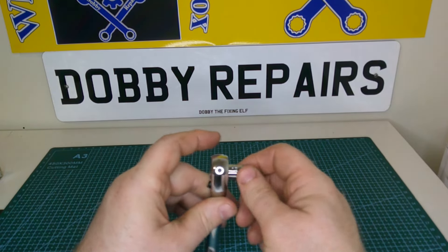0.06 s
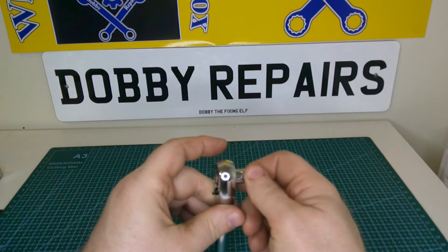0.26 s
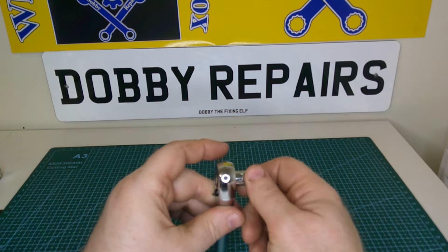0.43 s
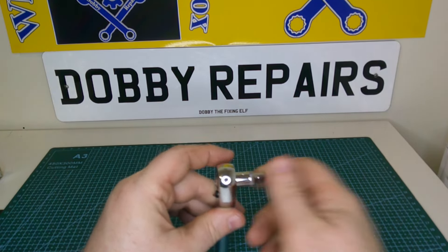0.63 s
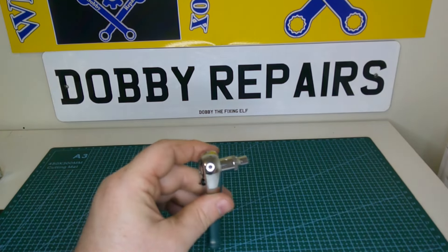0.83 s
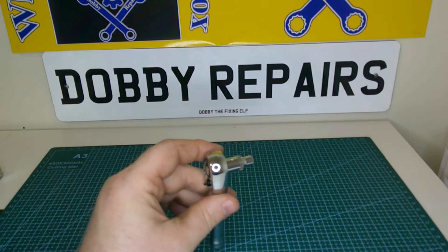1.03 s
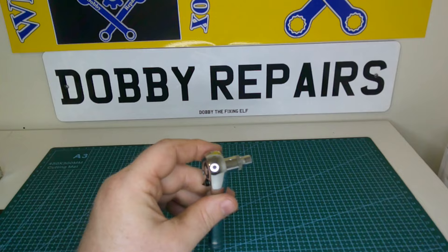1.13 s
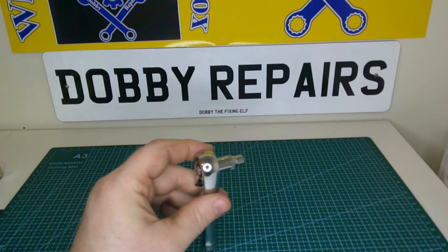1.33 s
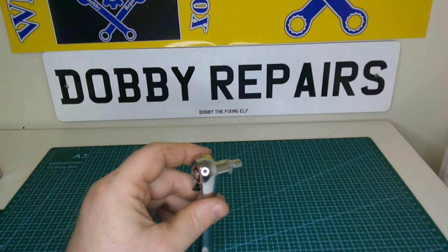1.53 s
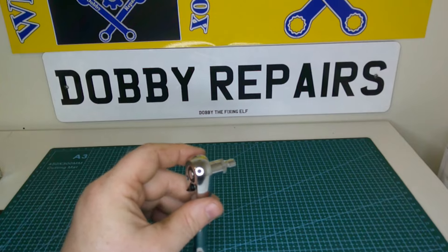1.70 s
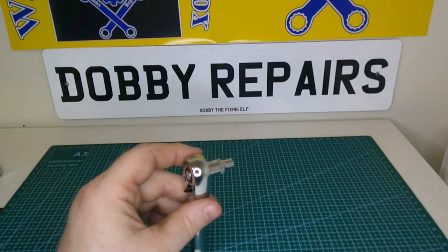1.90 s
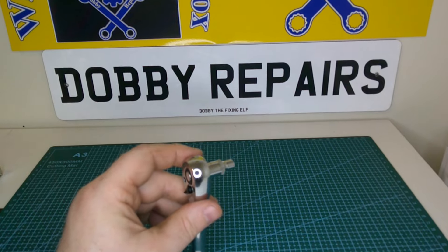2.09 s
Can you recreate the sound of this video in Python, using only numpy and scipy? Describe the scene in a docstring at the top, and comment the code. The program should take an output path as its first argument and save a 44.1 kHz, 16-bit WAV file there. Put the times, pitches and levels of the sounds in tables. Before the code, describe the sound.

A small hand ratchet clicks sharply in two fast runs, then a light tick and grainy finger slides, two faint ticks and a dull scuff; close microphone with dulled extreme treble, low rumble, hiss and faint hum.

```python
"""Close on a workbench, fingers turn a small steel ratchet: two short twists of pawl clicks, a light tick between them.
Each click is a crack of noise and damped rings of pawl and head, with one rebound and a small room's answer.
The hand lets go with a last tick and slides away, in swells of grainy noise; then the other hand shifts its grip,
with more swells, two faint ticks and a dull scuff. Rumble, hiss and a faint hum lie under it all,
and the microphone keeps nothing above the clicks' bright ring."""
import sys
import numpy as np
from scipy import signal
from scipy.fft import rfft, irfft, next_fast_len
from scipy.io import wavfile
from scipy.ndimage import map_coordinates

SR = 44100
rng = np.random.default_rng(int(sys.argv[2]) if len(sys.argv) > 2 else 0)


def digitize_waveform(pressure):
    """Quantize a signal to 16-bit integers and store it at the path in sys.argv[1].

    Rows of a 2-D input are taken as channels; values are limited to [-1, 1].
    """
    field = np.atleast_2d(pressure).T
    bounded = np.clip(field, -1, 1)
    quanta = np.round(bounded * 32767).astype(np.int16)
    wavfile.write(sys.argv[1], SR, quanta)


N = 94815  # length in samples


def ratchet():
    """The pawl snaps into each tooth and rebounds once; each contact cracks and rings the pawl, the drop rings the head."""
    # pawl drops; rebound and head levels are relative to the first contact and to the whole snap:
    # start_s, level_db, pawl_pitch_hz, least_rebound_delay_s, rebound_db, head_ring_db
    clicks = [(0.2366, -20, 7940, .0016, -17, 5.5), (0.2501, -19, 7820, .0017, -30, 3.5),
              (0.2631, -20, 7730, 0.0014, -9.5, 2), (.2780, -19.5, 7460, .0014, -2, 0),
              (.4587, -19, 7480, 0.0017, 2.5, -2), (0.4634, -22, 8150, .0016, -22, -2.5),
              (0.4786, -18, 7700, .0015, -11, 0.5), (.4885, -21, 7600, 0.0019, -7, 2.5),
              (0.51, -17.5, 7770, .0026, -16, 0.5)]
    # colour of the contact noise: frequency_hz, density_db
    crack_colour = [(150, -19), (500, -13), (1000, -18), (2800, -23), (4200, -12.5), (4900, -24.5),
                    (5600, -7.5), (7000, -3.5), (8200, 4.5), (9000, -9)]
    crack_db, crack_t60_s = -8.5, 0.013  # before the snap is levelled
    level_window_s = 0.0041  # the snap's energy is spread over this time to set its rms
    t = np.arange(SR // 8) / SR

    def contact(pitch_hz):
        crack_decay = amp(crack_db - 60 * t / crack_t60_s)
        crack = crack_decay * noise(crack_colour)[:len(t)]
        return pawl_ring(pitch_hz, t) + crack

    out = np.zeros(N)
    for start_s, level_db, pitch_hz, rebound_s, rebound_db, head_db in clicks:
        snap = contact(pitch_hz)
        # the rebound lands anywhere within one cycle of the pawl's pitch
        add(snap, rebound_s + rng.random() / pitch_hz, amp(rebound_db) * contact(pitch_hz))
        snap = snap / np.sqrt(np.sum(snap ** 2) / (level_window_s * SR))
        click = snap + amp(head_db) * head_ring(t)
        add(out, start_s, amp(level_db) * in_room(click))
    return out


def pawl_ring(pitch_hz, t):
    """The pawl's brief bright ring: damped modes at multiples of its pitch, with a fast attack."""
    # modes of the pawl: pitch_multiple, level_db, t60_s
    pawl_modes = [(.91, -31, .008), (.965, -8, 0.0082), (0.998, -2, 0.013), (1.051, -9.5, 0.0071)]
    attack_s = 0.00026
    modes = [(multiple * pitch_hz, db, t60) for multiple, db, t60 in pawl_modes]
    return (1 - np.exp(-t / attack_s)) * ring(modes, t)


def head_ring(t):
    """The head's longer ring, whose damped modes build just after the contact."""
    # modes of the ratchet head: frequency_hz, level_db, t60_s
    head_modes = [(1018, -28, 0.025), (2128, -33, 0.041), (3686, -21.5, 0.029), (4514, -17, 0.016),
                  (5475, -14.5, 0.036), (5880, -17, .018), (6075, 0, .028), (6500, -22, 0.017),
                  (6820, -14, 0.041)]
    rise_s = 0.0012
    return (1 - np.exp(-t / rise_s)) * ring(head_modes, t)


def ring(modes, t):
    """Damped modes set off together, each struck and detuned a little differently every time."""
    scatter_db, scatter_hz = 1.5, 30  # standard deviations; the grip detunes the ring from click to click
    out = np.zeros(len(t))
    for hz, db, t60_s in modes:
        struck_db = db + scatter_db * rng.standard_normal()
        struck_hz = hz + scatter_hz * rng.standard_normal()
        out += amp(struck_db - 60 * t / t60_s) * np.sin(2 * np.pi * struck_hz * t)
    return out


def ticks():
    """Fingers nudge the tool's loose parts: decaying bursts of noise that jog the head and the pawl."""
    # nudges, with rings relative to the tick: start_s, level_db, head_ring_db, pawl_ring_db
    nudges = [(.3565, -44.5, -17, 5.5), (0.6196, -30, -2, 8), (1.3835, -39, -23, -17),
              (1.734, -46.5, -22, -15)]
    # colour of the tick's noise: frequency_hz, density_db
    tick_colour = [(300, -5), (1000, -6.5), (2500, -4.5), (4000, -3), (5000, -4.5), (6200, 1), (7300, -3.5),
                   (8500, -6)]
    tick_t60_s, pawl_pitch_hz = 0.012, 7560
    out, t = np.zeros(N), np.arange(SR // 8) / SR
    for start_s, level_db, head_db, pawl_db in nudges:
        tick = amp(-60 * t / tick_t60_s) * noise(tick_colour)[:len(t)]
        tick = tick + amp(head_db) * head_ring(t)
        tick = tick + amp(pawl_db) * pawl_ring(pawl_pitch_hz, t)
        add(out, start_s, amp(level_db) * tick)
    return out


def hands():
    """Skin slides on steel and on the mat: swells of two noise bands, roughened by stick and slip."""
    # slides: peak_s, rise_s, fall_s, body_level_db, treble_over_body_db
    rubs = [(.65, 0.085, 0.059, -56, 5), (0.724, 0.044, 0.027, -54.5, 4.5), (.9, 0.11, .1, -62, -1),
            (1.39, 0.13, 0.23, -59.5, -1), (1.85, 0.066, 0.052, -66.5, 6.5), (2.04, 0.044, 0.14, -64, 6.5)]
    # colours of the two bands: frequency_hz, density_db
    body_colour = [(300, -9), (800, 0.5), (1400, -4), (2200, -1), (2900, -3.5), (3700, -0.5), (5000, -19),
                   (7000, -38)]
    treble_colour = [(3000, -29), (5000, -11.5), (6100, -5), (7200, 2), (8200, -6), (9000, -14)]
    grain_depth_db, grain_rate = 1, 140  # stick and slip: standard deviation at the knots, knots a second
    t = np.arange(N) / SR
    body, treble, out = noise(body_colour), noise(treble_colour), np.zeros(N)
    for peak_s, rise_s, fall_s, level_db, treble_db in rubs:
        swell = np.exp(-((t - peak_s) / np.where(t < peak_s, rise_s, fall_s)) ** 2)
        out += amp(level_db) * swell * (body + amp(treble_db) * treble)
    grain = unit(amp(grain_depth_db * wobble(grain_rate)))
    return out * grain


def scuff():
    """A fingertip drags briefly on the handle: a dull band of noise under one bell-shaped swell."""
    peak_s, width_s, level_db = 1.725, 0.04, -56.5
    centre_hz, width_octaves = 1300, 0.79

    def dull_band(hz):
        octaves = np.log2((hz + 1) / centre_hz)
        return np.exp(-(octaves / width_octaves) ** 2)

    band = unit(filtered(rng.standard_normal(N), dull_band))
    swell = np.exp(-((np.arange(N) / SR - peak_s) / width_s) ** 2)
    return amp(level_db) * band * swell


def in_room(x, count=10):
    """The direct sound, a few echoes from bench and walls, then a short diffuse tail of decaying noise."""
    # decay of the small room: frequency_hz, t60_s
    room_decay = [(200, .3), (2000, .3), (6000, 0.23), (9000, 0.16)]
    tail_db, tail_delay_s = -14, 0.009
    echoes_db, echo_spread_s = -24, 0.016
    hz, t, grid = signal.stft(rng.standard_normal(SR // 2), SR, nperseg=256)
    decay = amp(-60 * t / along(room_decay, hz)[:, None])
    tail = signal.istft(grid * decay, SR, nperseg=256)[1]
    answer = signal.unit_impulse(SR // 2)  # the direct sound
    add(answer, tail_delay_s, amp(tail_db) * tail / np.linalg.norm(tail))
    for when, size in rng.random((count, 2)):
        echo = amp(echoes_db) * (size + 0.5) / np.sqrt(count)
        add(answer, echo_spread_s * (when + 0.06), np.array([echo]))
    return signal.fftconvolve(x, answer)[:N]


def background():
    """Room rumble and a slowly drifting hiss, both coloured noise, and a faint hum of tones with wavering phase."""
    # colours of rumble and hiss: frequency_hz, density_db
    rumble_colour = [(15, -27.5), (25, -3), (60, -5), (100, -4), (170, -5), (290, -10), (400, -15),
                     (650, -20), (1000, -25), (2500, -54)]
    hiss_colour = [(500, -17), (900, -1), (1500, 1), (1800, 1), (2100, 2), (2600, -3), (3700, -5.5),
                   (4800, -12), (6000, -9), (7400, -3.5), (8300, -7.5)]
    # drift of the hiss: time_s, level_db
    hiss_level = [(0, -60.5), (.4, -57.5), (.8, -56.5), (1.15, -58.5), (1.55, -56.5), (1.8, -56.5),
                  (2.15, -56)]
    # hum tones: frequency_hz, rms_db
    hum_tones = [(140, -65.5), (350, -68.5)]
    rumble_db = -49
    t = np.arange(N) / SR
    rumble = amp(rumble_db) * noise(rumble_colour)
    hiss = amp(np.interp(t, *np.transpose(hiss_level))) * noise(hiss_colour)
    hum = np.zeros(N)
    for hz, db in hum_tones:
        phase = 2 * np.pi * hz * t + 0.21 * wobble(4)
        hum += amp(db) * np.sqrt(2) * np.sin(phase)
    return rumble + hiss + hum


def amp(db):
    """Decibels to gain."""
    return 10 ** (np.asarray(db) / 20)


def unit(x):
    """Scale to rms 1."""
    return x / np.sqrt(np.mean(x ** 2) + 1e-20)


def along(points, hz):
    """Read a curve of (Hz, value) points on a log frequency axis."""
    f, v = np.transpose(points)
    return np.interp(np.log(hz + 1), np.log(f + 1), v)


def filtered(x, response):
    """Multiply the spectrum of x by a response, a function of frequency in Hz."""
    m = next_fast_len(N + SR // 2)
    return irfft(rfft(x, m) * response(np.fft.rfftfreq(m, 1 / SR)), m)[..., :N]


def noise(spectrum):
    """Coloured noise of rms 1."""
    return unit(filtered(rng.standard_normal(N), lambda hz: amp(along(spectrum, hz))))


def wobble(rate):
    """A smooth random curve, rate knots a second."""
    return map_coordinates(rng.standard_normal(N), [np.arange(N) * rate / SR])


def add(track, s, sound):
    """Mix a sound in at time s, in seconds."""
    part = track[max(round(s * SR), 0):][:len(sound)]
    part += sound[:len(part)]


def scene():
    """The ratchet and hands close to the microphone; clicks and ticks also reach it by way of the room."""
    return (ratchet() + in_room(ticks()) + hands() + scuff() + background())[None]


def record(dry):
    """The microphone's treble falls steeply to its band limit."""
    # treble roll-off: frequency_hz, gain_db
    roll_off = [(8200, 0), (8500, -9), (8750, -17.5), (9000, -35), (9500, -51)]
    top_hz = 9539
    return filtered(dry, lambda hz: amp(along(roll_off, hz)) * (hz < top_hz))


dry = scene()
out = record(dry)
digitize_waveform(out)
```